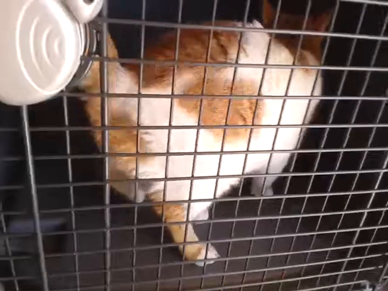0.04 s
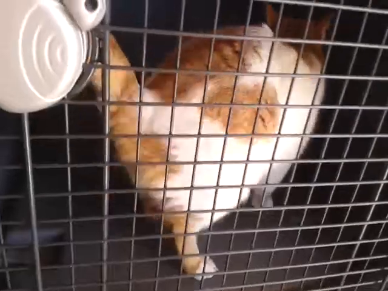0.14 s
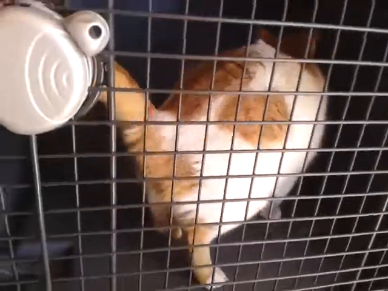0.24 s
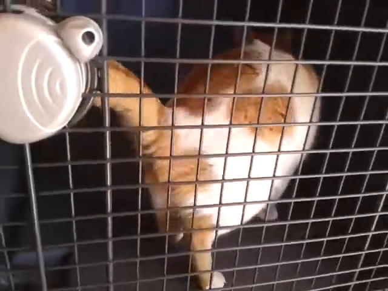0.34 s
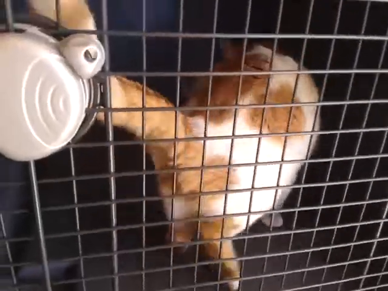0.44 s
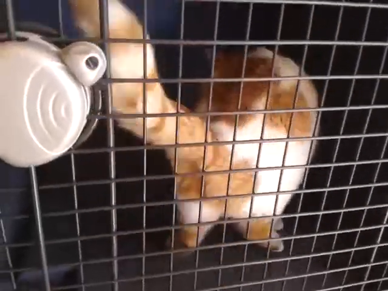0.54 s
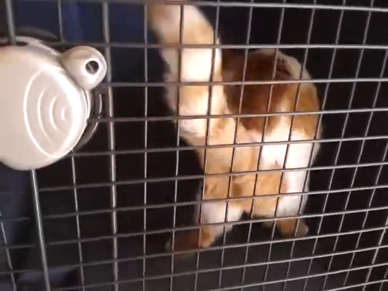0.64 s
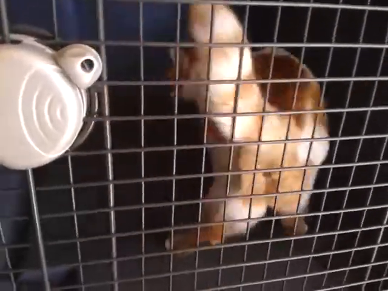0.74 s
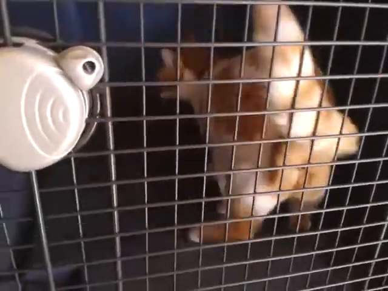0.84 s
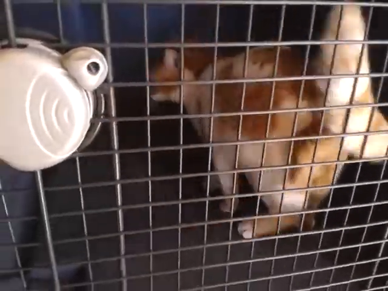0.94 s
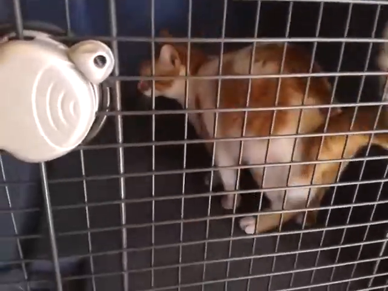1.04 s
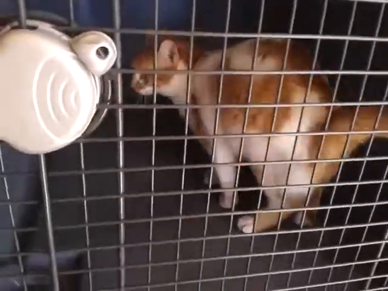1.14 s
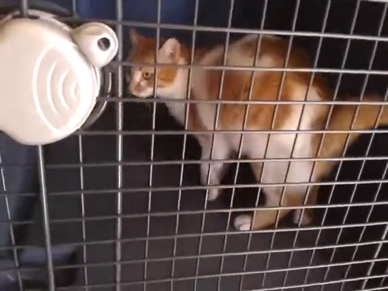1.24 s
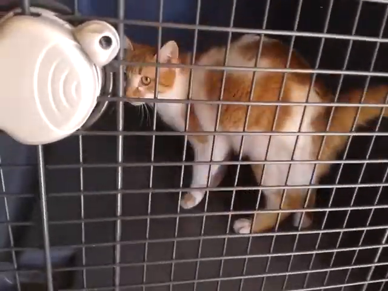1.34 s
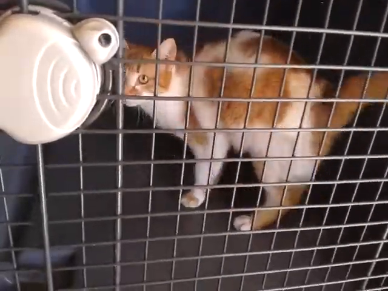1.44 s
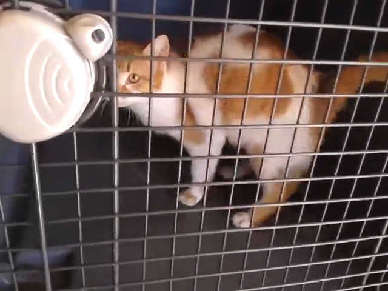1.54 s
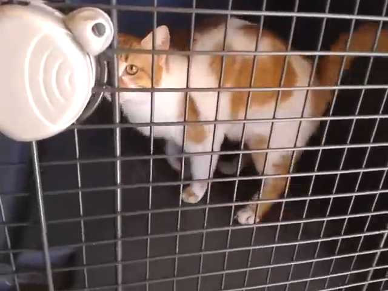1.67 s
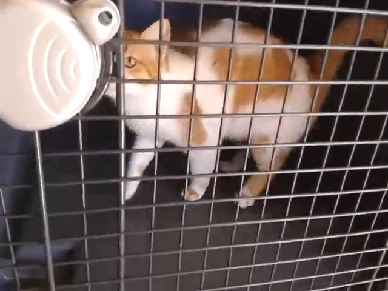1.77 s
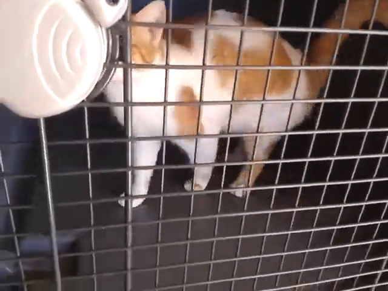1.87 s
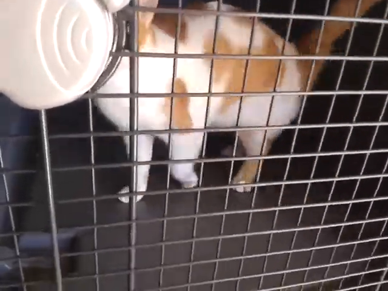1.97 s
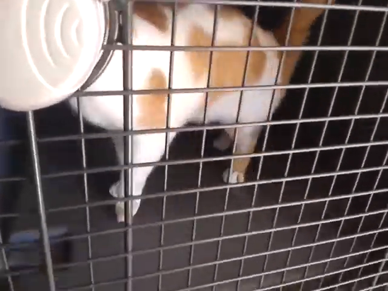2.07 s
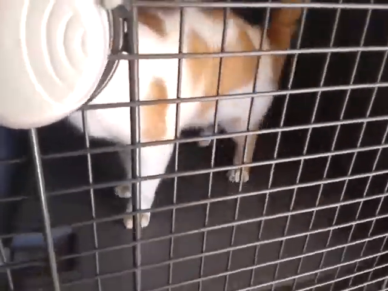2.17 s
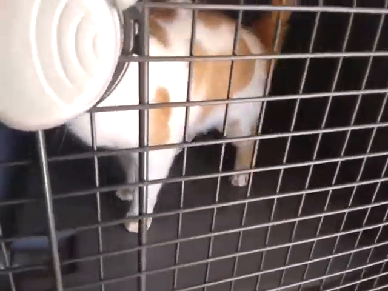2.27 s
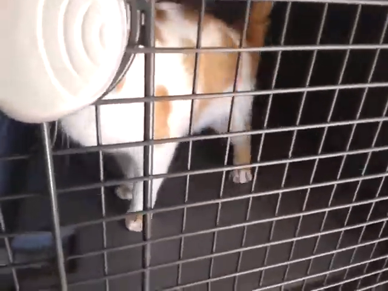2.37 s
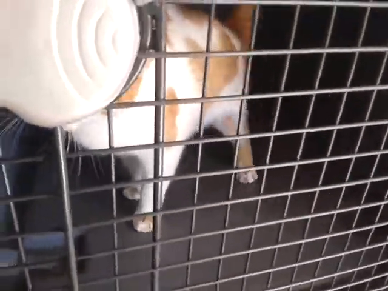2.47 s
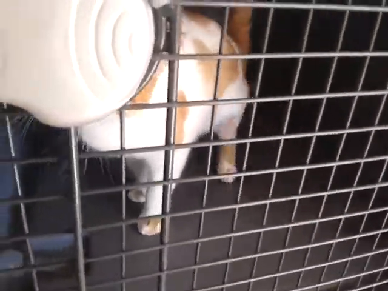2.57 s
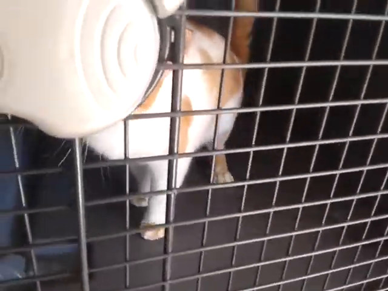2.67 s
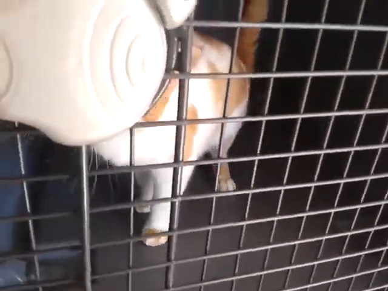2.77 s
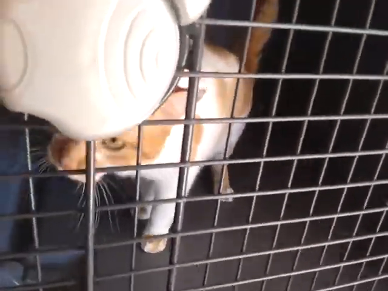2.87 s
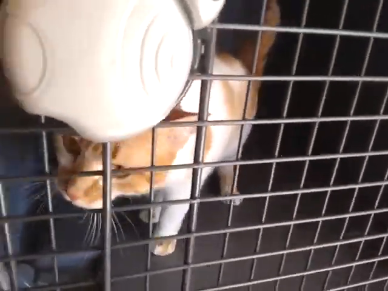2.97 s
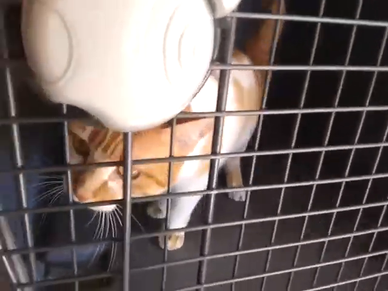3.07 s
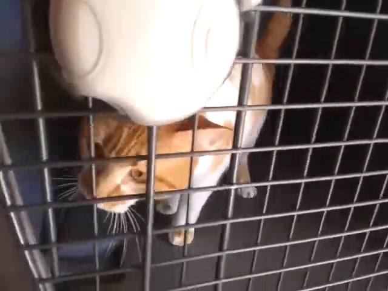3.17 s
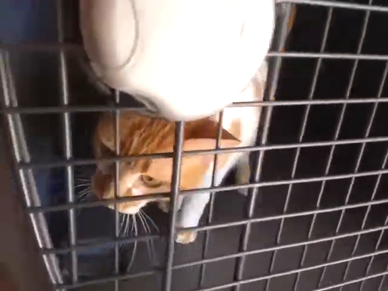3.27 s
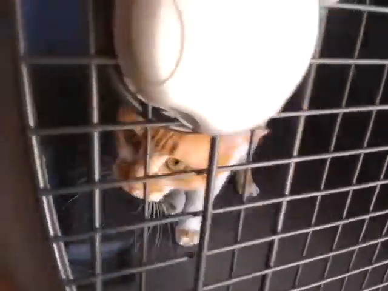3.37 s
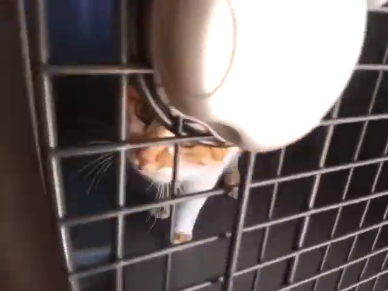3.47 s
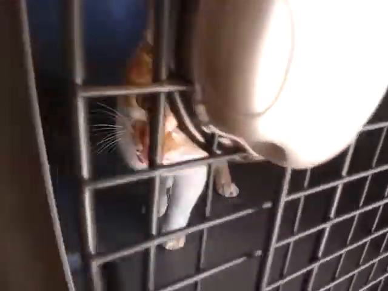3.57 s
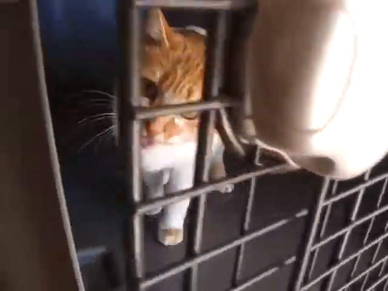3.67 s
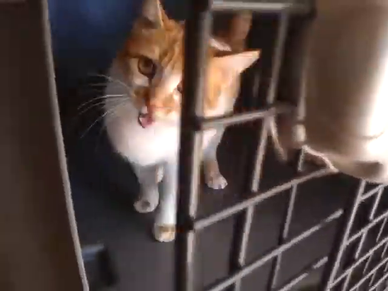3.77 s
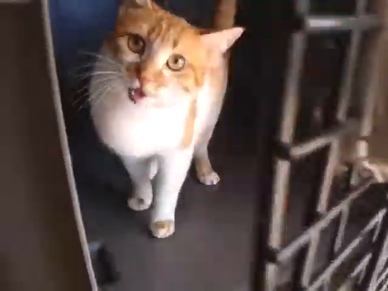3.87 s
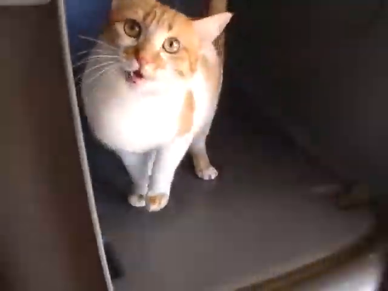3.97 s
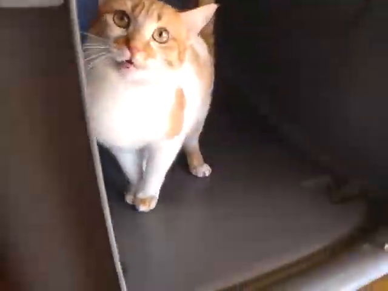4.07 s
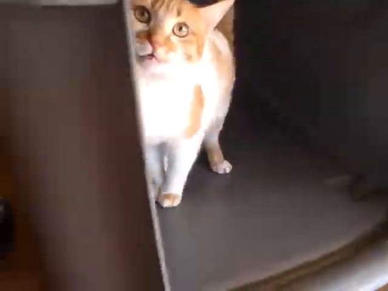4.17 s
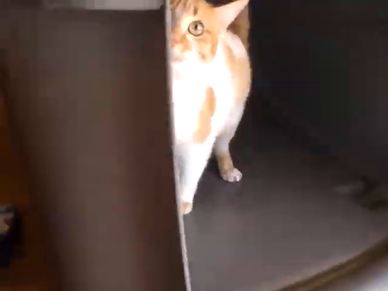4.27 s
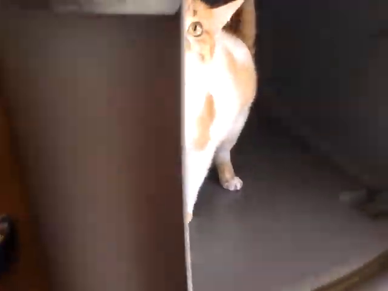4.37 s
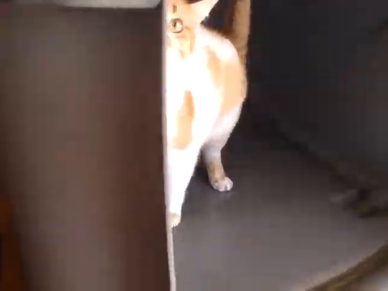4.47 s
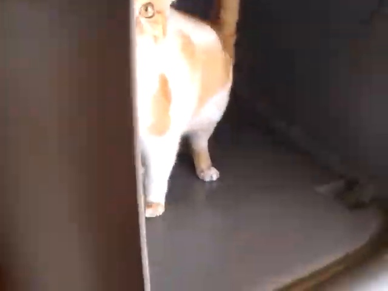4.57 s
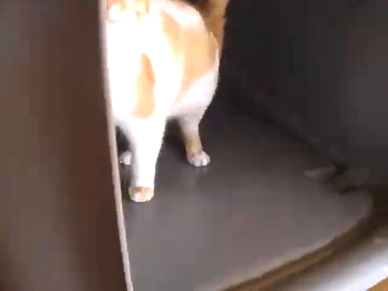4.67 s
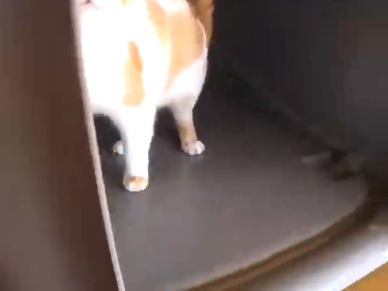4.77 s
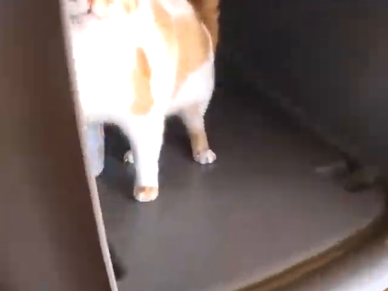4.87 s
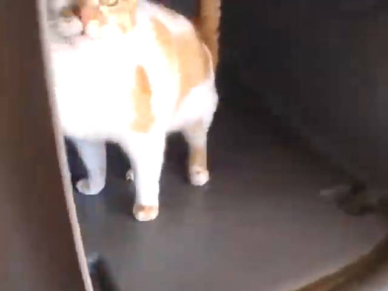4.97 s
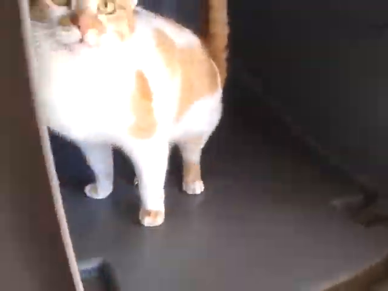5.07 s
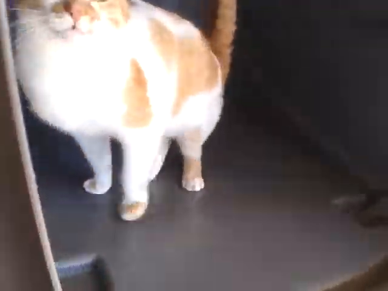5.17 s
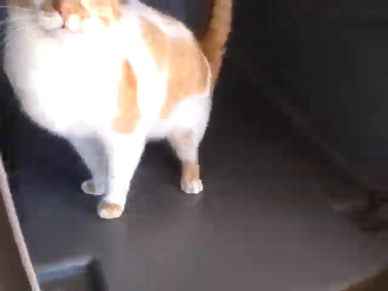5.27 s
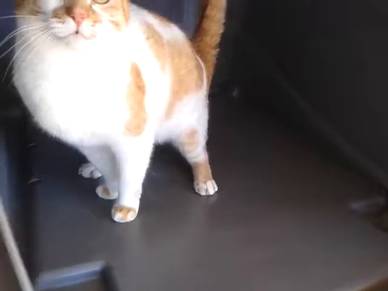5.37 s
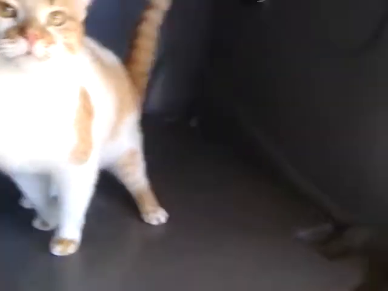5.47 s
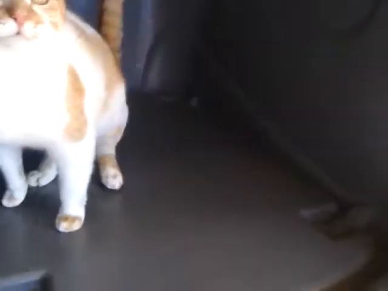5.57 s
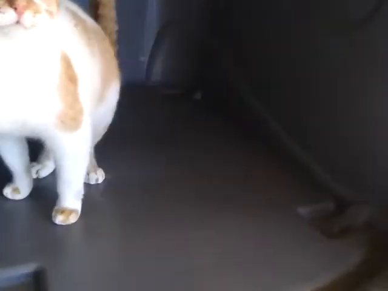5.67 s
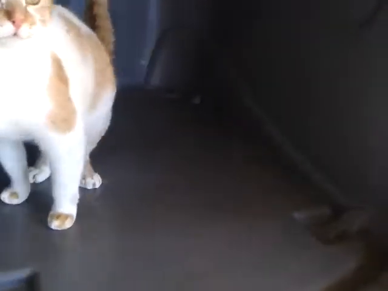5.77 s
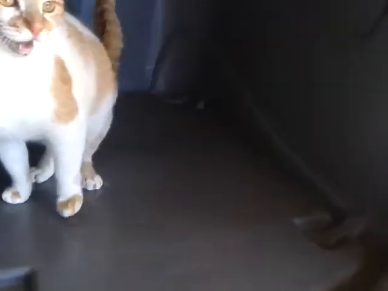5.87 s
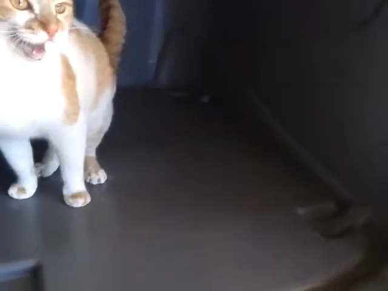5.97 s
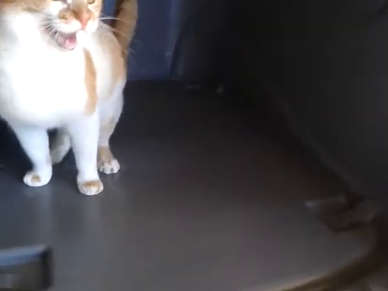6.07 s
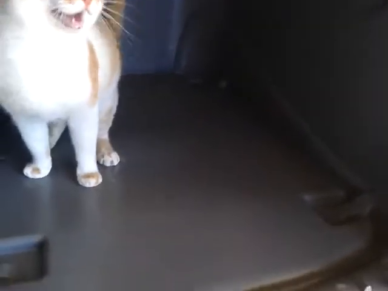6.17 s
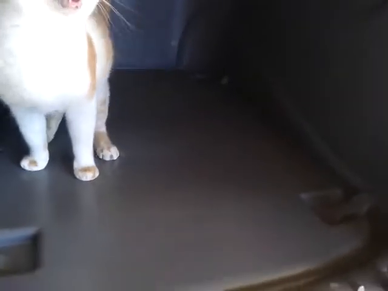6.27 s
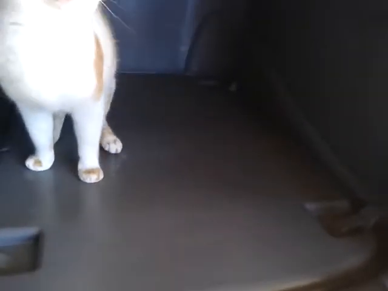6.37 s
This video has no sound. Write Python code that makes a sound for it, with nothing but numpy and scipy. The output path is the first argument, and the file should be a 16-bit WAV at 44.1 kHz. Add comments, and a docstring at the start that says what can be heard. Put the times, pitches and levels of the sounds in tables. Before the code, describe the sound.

Close to a phone in a small room with faint hiss, a cat meows three times from its carrier. The first meow is soft and opens with a creaky trill. Then comes the loudest sound, a quick clatter of knocks on the wire door. The second meow is clear, rising and falling; the third follows a latch click and starts roughly. Light plastic ticks and soft rustling of paws and cloth fill the gaps.

```python
"""A cat meowing in its carrier

A cat in a plastic carrier meows three times, close to a phone in a small quiet room. Its vocal folds
make the tone and its mouth shapes it; the first and last meows start as a rough trill. A hand works
the latch: the wire door knocks and rings, and the plastic ticks and thumps. Fur, paws and cloth rustle
over the room's hiss. The phone's microphone opening lifts everything near 5.6 kHz."""
import sys
import numpy as np
from scipy import signal
from scipy.fft import rfft, irfft
from scipy.io import wavfile
from scipy.ndimage import uniform_filter1d

SR = 44100
rng = np.random.default_rng(int(sys.argv[2]) if len(sys.argv) > 2 else 0)


def put_to_file(sound):
    """Save the sound as 16-bit audio at rate SR, in the file named by the first command-line argument."""
    columns = np.atleast_2d(sound).T  # one column per channel
    safe = np.clip(columns, -1, 1)
    whole_steps = np.round(safe * 32767)
    wavfile.write(sys.argv[1], SR, whole_steps.astype(np.int16))


N = 283563

# How each meow moves, one table a meow. Levels in all tables are relative.
# time_s, pitch_hz, level_db, mouth_opening (0-1), front_resonance_hz, upper_harmonics_db
MEOW_CURVES = [
    [(1.085, 600, -61, 0.33, 5700, -90), (1.158, 684, -56, 0.31, 5700, -83),
     (1.278, 716, -48, 0.16, 5700, -57), (1.33, 735, -48.5, 0.28, 5800, -64),
     (1.39, 733, -45.5, 0.18, 6000, -57.5), (1.454, 719, -49.5, 0.27, 5900, -75),
     (1.5, 610, -65, 0, 5600, -90)],
    [(3.465, 640, -55.5, 0.7, 5600, -76), (3.512, 684, -51, 0.11, 5600, -49),
     (3.564, 854, -35.5, 0.49, 5690, -34.5), (3.606, 903.7, -31, 1, 5600, -36.5),
     (3.692, 935, -34.5, 0.61, 6120, -43.5), (3.804, 911, -38, 0.67, 5730, -43.5),
     (3.87, 879, -40, 0.61, 6150, -48.5), (3.94, 857, -38, 0.67, 6100, -48),
     (4.01, 841.5, -42.5, 0.52, 6040, -52), (4.088, 819, -45, 0.16, 5850, -56.5),
     (4.14, 813.5, -46, 0.32, 5730, -60), (4.2, 808, -47.5, .3, 5800, -63), (4.29, 828, -50, 0, 5700, -63),
     (4.36, 800, -73, 0.1, 5700, -90)],
    [(5.75, 660, -57, 0.17, 4600, -70), (5.795, 715, -46, 0, 4620, -47),
     (5.845, 820, -43.5, 0.16, 5080, -29.5), (5.88, 886, -37, 0.7, 5360, -36),
     (5.945, 950, -41.5, 0.37, 5670, -39.5), (5.99, 944, -41, .5, 5730, -41),
     (6.04, 940.3, -41.5, 0.42, 6000, -59), (6.131, 906, -41.5, 0.06, 5480, -46),
     (6.221, 857, -45, 0, 5670, -48), (6.31, 838, -50, 0.71, 6220, -48.5),
     (6.379, 812, -49.5, 0.21, 5700, -59), (6.43, 746, -48.5, 0, 5500, -47)],
]
# The resonance of the roof of the mouth, one value a meow: level_db
PALATE_LEVELS = [-12, -5, -15]
# Pitches where the carrier's walls cancel the voice: pitch_hz, width_hz, depth (0-1)
WALL_DIPS = [(733, 22, .8), (848, 14, .65), (925, 12, .55)]
# Creaky trills: start_s, length_s, first_db, last_db, first_pulse_hz, last_pulse_hz, upper_db
TRILL_EVENTS = [(.79, 0.28, -54.5, -51, 99.9, 131.1, 3), (5.63, .13, -43, -51, 115.1, 168, 3.2)]
# Throat resonances with the mouth closed: centre_hz, width_hz, level_db
THROAT_CLOSED = [(440, 100, 0), (575, 90, -2), (1070, 170, -8), (1250, 100, -8), (1850, 110, -11),
                 (2500, 110, -15)]
# Throat resonances as the mouth opens: centre_hz, width_hz, level_db
THROAT_OPENING = [(500, 300, 0), (750, 300, 0), (1050, 400, -3), (1300, 300, -6), (1900, 500, -14)]
# Brief flares near 1.7 kHz, placed where a meow's rising second harmonic crosses a resonance:
# start_s, peak_db, centre_hz, width_hz, decay_s, treble_db
RESONANCE_FLARES = [(3.548, -25, 1730, 450, 0.043, -58), (5.836, -31, 1750, 450, 0.049, -45)]
# Blows on the door, whose ring the hand damps: start_s, level_db, contact_ms, bright_db, ring_db
DOOR_KNOCKS = [(2.008, -16.5, 21, -8, -26), (2.024, -10.5, 15, -10, -20), (2.062, -12, 10, -13, -23),
               (2.066, -3, 14, -4, -19.5), (2.076, -6.5, 8.6, -10, -16.5), (2.093, -19, 60, -12, -8),
               (2.13, -18, 80, -9, -30), (2.182, -17, 9.3, -6.5, -21), (2.193, -24, 8.5, 1, -26),
               (2.244, -19.5, 6.6, -26, -14.5), (2.278, -11.5, 6.8, -5, -15), (2.32, -14, 10.4, -13, -15),
               (2.336, -22.5, 57, -17, -13), (2.562, -28.5, 20, -17, -23), (2.639, -31, 15, -19, -19)]
# The ringing tones of the door's wires: pitch_hz, level_db, decay_s
WIRE_TONES = [(1416, 0, .4), (1631, -3, .09), (1793, -3, .1), (2170, -8, .13), (2331, -10, .15),
              (2907, -9, .1), (3058, -9, .1), (5300, -10, .07), (5600, -5, .05), (7100, -8, .05)]
# Blows on the plastic shell: start_s, level_db, contact_ms
SHELL_BLOWS = [(1.47, -49, 12), (1.6, -51.5, 8.7), (2.091, -31, 29), (2.129, -30, 41), (2.18, -32, 52),
               (2.518, -30.5, 17), (2.545, -37, 59), (4.523, -48.5, 8.8)]
# The ringing tones of the shell: pitch_hz, level_db, decay_s
SHELL_TONES = [(283, 8, 0.0077), (465, 3, 0.019), (670, -0.5, 0.008), (910, -31, 0.019), (1317, 5.5, 0.1),
               (1975, 20.5, 0.011)]
# Ticks of plastic, claws and latch: start_s, peak_db, centre_hz, width_hz, decay_s, treble_db
SMALL_TICKS = [(.082, -43.5, 2400, 3000, 0.056, -18), (.21, -31.5, 2700, 2600, 0.03, -23),
               (.305, -42.5, 5440, 4000, 0.11, -17), (.361, -45.5, 3750, 2000, 0.028, -20),
               (.487, -39, 3500, 4000, 0.017, -13), (.496, -25, 3150, 4900, 0.11, -20),
               (.509, -28.5, 4320, 6000, 0.044, -27), (.7, -47, 5470, 5000, .04, -3),
               (.95, -26.5, 2140, 1300, 0.018, -21), (1.064, -39, 3200, 3000, .008, -20),
               (1.44, -27.5, 3800, 5030, 0.04, -4), (1.595, -36, 3500, 8900, 0.13, -10),
               (1.889, -34, 4650, 6000, 0.027, -18), (2.002, -14, 2730, 2420, 0.014, -23.5),
               (2.03, -30, 700, 905, 0.29, -40), (2.518, -37.5, 2500, 2900, 0.08, -19),
               (3.312, -40, 5600, 4000, 0.055, 3), (3.401, -28, 5600, 5000, 0.016, -10),
               (3.795, -32.5, 3440, 1500, .05, -23), (4.29, -34, 3440, 1210, 0.19, -25),
               (4.522, -30.5, 1980, 2870, 0.064, -22), (5.39, -36.5, 885, 1000, 0.036, -25),
               (5.463, -32, 5340, 2000, 0.057, -20), (5.4877, -16.5, 2310, 6300, 0.0013, -17),
               (5.489, -14, 3970, 9150, 0.00086, -11), (5.653, -31, 1430, 2500, .03, -29)]
# Strokes of fur, paws and cloth: peak_s, rise_s, fall_s, level_db, upper_db, treble_db
RUB_STROKES = [(.3, .08, 0.17, -64, -3.5, -3), (.72, 0.072, 0.23, -63, -7, -8),
               (1.17, 0.17, 0.15, -46.5, -15, -12), (1.44, 0.0078, 0.032, -44.5, -6.5, -14),
               (1.64, 0.037, 0.014, -61, -5, -16), (1.9, 0.036, 0.039, -40, -13, -16),
               (1.986, 0.063, 0.036, -37, -6, -6.5), (3.191, 0.068, 0.056, -46, -7.5, -9),
               (3.371, .04, 0.031, -46.5, 3, 2), (3.41, 0.036, 0.038, -42.5, -4.5, -14),
               (3.83, 0.027, 0.25, -54.5, -0.5, -3), (4.1, 0.066, .07, -57, -3, -6.5),
               (4.3, 0.15, 0.12, -54, -14, -7), (4.55, 0.086, 0.19, -64.5, -9, -8),
               (5.2, 0.7, 0.9, -59, 1, -2.5), (5.475, 0.072, 0.041, -52.5, 3.5, -1),
               (5.67, 0.079, 0.16, -55.5, -1.5, -8), (6.06, .09, 0.18, -47, 1, -9.5),
               (6.43, 0.058, .05, -44.5, 0.5, -6)]
# Resonances of the rubbed surfaces: centre_hz, width_hz, level_db
RUB_BANDS = [(2160, 2370, 11), (3214, 1600, 10), (560, 190, 1.5)]
# The tone colour of the background hiss: frequency_hz, level_db
HISS_SHAPE = [(30, -11.5), (80, -17.5), (160, -8.5), (350, -4.5), (700, -6.5), (1500, -13), (3000, -13),
              (5500, -12), (8500, -18.5), (16000, -26.5)]


def meows():
    """The vocal folds make harmonics (multiples of the pitch), and the mouth boosts some of them."""
    hz, db, opening, front_hz, upper_db = curves([row for meow in MEOW_CURVES for row in meow])[1]
    gates = [curves(meow)[0] for meow in MEOW_CURVES]
    rough = fold_roughness()  # shakes the pitch and chops the level
    shaky_hz = hz * (1 + .00204 * wander(30) + .09 * rough * wander(110))
    phase = 2 * np.pi * np.cumsum(shaky_hz) / SR
    flutter = gain(3.3 * rough * (wander(90) + 2))
    mouth_hz = 700 + 2280 * opening  # the lowest resonance rises as the jaw drops
    palate = sum(gain(level) * gate for level, gate in zip(PALATE_LEVELS, gates))
    voice = 0
    for k in range(1, 10):
        harmonic_hz = k * hz
        if k < 4:
            mouth = gain(12) * hump(harmonic_hz, mouth_hz, width_hz=910)
            throat = gain(6.5) * hump(harmonic_hz, 2720, width_hz=480)
            strength = gain(db - 5 * k + 2 * wander(25)) * (1 + mouth + throat)
        else:
            front = hump(harmonic_hz, front_hz, width_hz=500) + gain(-23 - 4.6 * abs(k - 7.5))
            strength = gain(upper_db) * (front + palate * hump(harmonic_hz, 3600, width_hz=600))
            strength *= gain(3 * wander(35))  # echoes in the carrier make it come and go
            strength *= np.clip(1 - 3 * rough, 0, 1)
        if k == 1:  # an open mouth and the carrier's walls weaken the lowest harmonic
            dips = [1 - depth * hump(hz, centre, width) for centre, width, depth in WALL_DIPS]
            strength *= gain(-2 * opening) * np.prod(dips, axis=0)
        voice += strength * np.sin(k * phase)
    return np.sqrt(2) * sum(gates) * flutter * voice


def fold_roughness(settle_s=.05, break_s=.025):
    """The vocal folds flutter most as a meow starts and as it breaks off."""
    t, rough = np.arange(N) / SR, .025
    for meow in MEOW_CURVES:
        start_s, end_s = meow[0][0], meow[-1][0]
        rough += .5 * np.exp(-abs(t - start_s) / settle_s) + .45 * np.exp(-abs(t - end_s) / break_s)
    return rough


def trill(event, throat):
    """Slow, uneven pulses of the vocal folds speed up and ring the throat, each with a puff of air."""
    start_s, length_s, first_db, last_db, first_hz, last_hz, upper_db = event
    ends = [(start_s, first_db, first_hz), (start_s + length_s, last_db, last_hz)]
    gate, (db, pulse_hz) = curves(ends, edge_s=.035)
    cycles = np.cumsum(pulse_hz * (1 + .18 * wander(60))) / SR
    pulses = np.diff(np.floor(cycles), prepend=0) * gain(3.5 * wander(80))
    puffs = .06 * rng.standard_normal(N) * np.exp(-(cycles % 1) / .3)
    bands = [gain(level) * steep_band(pulses + puffs, hz, width) for hz, width, level in throat]
    low, upper = sum(bands[:2]), sum(bands[2:])
    return gate * gain(db) * (low + gain(upper_db) * upper) / np.sqrt(np.mean(low ** 2))


def door_knocks():
    """Each blow rattles and cracks. It lands on other wires each time, so the ring varies a little."""
    out = np.zeros(N)
    for start_s, db, contact_ms, bright_db, ring_db in DOOR_KNOCKS:
        push = np.pad(contact(contact_ms), (0, SR // 2))
        strike = .7 * push + .6 * signal.unit_impulse(len(push))
        body = steep_band(push, 1930, 1780) + gain(-14) * steep_band(push, 2980, 890)
        bright = steep_band(push, 5330, 2300) + gain(-20.5) * steep_band(push, 8400, 3600)
        crack = body + gain(bright_db) * bright
        wires = [(hz * (1 + .006 * rng.normal()), level + 2 * rng.normal(), decay_s)
                 for hz, level, decay_s in WIRE_TONES]
        ringing = ring(steep_band(strike, 2650, 9600), wires)
        add(out, start_s, gain(db) * (gain(ring_db) * ringing + gain(23) * crack))
    return out


def shell_thumps():
    """Dull blows on the plastic shell give a broad clunk and a short ring."""
    blows = np.zeros(N)
    for start_s, db, contact_ms in SHELL_BLOWS:
        add(blows, start_s, gain(db) * contact(contact_ms))
    clunk = steep_band(steep_band(blows, 520, 1300), 600, 2500)
    return ring(clunk, SHELL_TONES) + gain(31.5) * clunk


def ticks(table):
    """Each tick is a sharp click with a short, noisy tail."""
    out, t = np.zeros(N), np.arange(SR // 6) / SR
    for start_s, db, hz, width_hz, decay_s, treble_db in table:
        burst = 3.05 * (t == 0) + rng.standard_normal(len(t)) * gain(-60 * t / decay_s)
        tick = steep_band(burst, hz, width_hz) + gain(treble_db) * steep_band(burst, 8800, 16000)
        add(out, start_s, gain(db) * tick / np.max(np.abs(tick)))
    return out


def rustle():
    """Rubbing fur, paws and cloth make tiny, uneven grains of noise. Each stroke swells and fades."""
    grains = rng.standard_normal(N) * gain(1.6 * rng.exponential(size=N) + 1.35 * wander(150))
    body = normalize(sum(gain(db + 2.3 * wander(60)) * steep_band(grains, hz, width)
                         for hz, width, db in RUB_BANDS))
    upper = normalize(steep_band(grains, 5290, 1270))
    treble = normalize(steep_band(grains, 22000, 10000))
    out, t = 0, np.arange(N) / SR
    for peak_s, rise_s, fall_s, db, upper_db, treble_db in RUB_STROKES:
        swell = np.exp(-((t - peak_s) / np.where(t < peak_s, rise_s, fall_s)) ** 2)
        out += swell * gain(db) * (body + gain(upper_db) * upper + gain(treble_db) * treble)
    return out


def room(x, echo_db, decay_s=.21):
    """A small furnished room adds a dense tail of echoes that loses its treble first."""
    t = np.arange(SR // 2) / SR
    noise = rng.standard_normal(len(t)) * (t > .004)
    tail = band(noise, 580, 5600) * gain(-60 * t / decay_s)
    tail += .5 * noise * gain(-60 * t / (.22 * decay_s))
    return x + gain(echo_db) * signal.fftconvolve(x, tail / np.sqrt(np.sum(tail ** 2)))[:N]


def hiss():
    """Room and microphone noise, in half-octave bands that waver a little."""
    hz = np.maximum(np.arange(N // 2 + 1) * SR / N, 1)
    shape_hz, shape_db = np.transpose(HISS_SHAPE)
    spectrum = rfft(rng.standard_normal(N)) * gain(np.interp(np.log(hz), np.log(shape_hz), shape_db))
    half_octaves = 2 * np.log2(hz / 20)
    swell, out = wander(.27), 0
    for k in range(22):
        noise = irfft(spectrum * np.clip(1 - abs(half_octaves - k), 0, 1), N)
        out += gain(.5 * swell + .24 * wander(3.58)) * noise
    return gain(-57) * normalize(out)


def contact(length_ms):
    """Two things rattle against each other: a fading burst of noise with an energy of 1."""
    t = np.arange(SR // 8) / SR
    push = rng.standard_normal(len(t)) * np.exp(-(t / (length_ms / 1000)) ** 1.06)
    return push / np.sqrt(np.sum(push ** 2))


def ring(x, tones):
    """Tones set ringing by x; each fades by 60 dB in its decay_s."""
    out = 0
    for hz, db, decay_s in tones:
        pole = np.exp(2j * np.pi * hz / SR - np.log(1000) / (decay_s * SR))
        out += gain(db) * signal.lfilter([1], [1, -pole], x).imag
    return out


def hump(hz, centre_hz, width_hz):
    """How strongly a resonance answers at hz: 1 at its centre, less to each side."""
    return 1 / (1 + (2 * (hz - centre_hz) / width_hz) ** 2)


def band(x, hz, width_hz):
    """A resonance: keeps the part of x near hz."""
    return signal.lfilter(*signal.iirpeak(hz, hz / width_hz, fs=SR), x)


def steep_band(x, hz, width_hz):
    """The same resonance twice, for steeper sides."""
    return band(band(x, hz, width_hz), hz, width_hz)


def wander(rate_hz):
    """A smooth random curve with a typical size of 1."""
    hold = int(SR / rate_hz)
    steps = np.repeat(rng.standard_normal(N // hold + 1), hold)
    return normalize(uniform_filter1d(uniform_filter1d(steps, hold), hold)[:N])


def curves(table, edge_s=.012):
    """A gate (1 during the table's time span, fading to 0 outside) and a curve for each column."""
    t = np.arange(N) / SR
    times, *columns = np.transpose(table)
    gate = np.interp(t, [times[0] - edge_s, times[0], times[-1], times[-1] + edge_s], [0, 1, 1, 0])
    return gate, [np.interp(t, times, column) for column in columns]


def add(out, start_s, x):
    """Mixes x into out, beginning at start_s."""
    i = int(start_s * SR)
    out[i:i + len(x)] += x[:N - i]


def gain(db):
    """Turns decibels into a multiplier."""
    return 10 ** (np.asarray(db) / 20)


def normalize(x):
    """Scales x to a typical size (rms) of 1."""
    return x / np.sqrt(np.mean(x ** 2))


def scene():
    """The cat and its carrier in the room, over rustle and hiss."""
    cat = meows() + trill(TRILL_EVENTS[0], THROAT_CLOSED) + trill(TRILL_EVENTS[1], THROAT_OPENING)
    cat = room(cat + ticks(RESONANCE_FLARES), echo_db=-12)  # less echo: it is near and faces the phone
    carrier = room(door_knocks() + shell_thumps() + ticks(SMALL_TICKS), echo_db=-9)
    return (cat + carrier + rustle() + hiss())[None]


def record(dry):
    """The microphone opening resonates, and the phone cuts the bass and the highest treble."""
    x = dry + gain(-.5) * band(dry, 5600, width_hz=1870)
    x = signal.sosfilt(signal.butter(1, 120, "high", fs=SR, output="sos"), x)
    x *= np.clip((np.arange(N) / SR - .072) / .022, 0, 1)  # a moment of silence, then a quick fade-in
    return signal.sosfilt(signal.ellip(10, .2, 80, 15900, fs=SR, output="sos"), x)


dry = scene()
out = record(dry)
put_to_file(out)
```